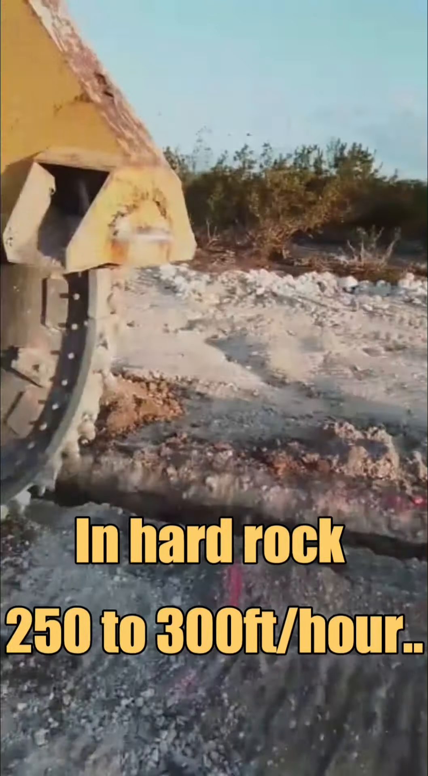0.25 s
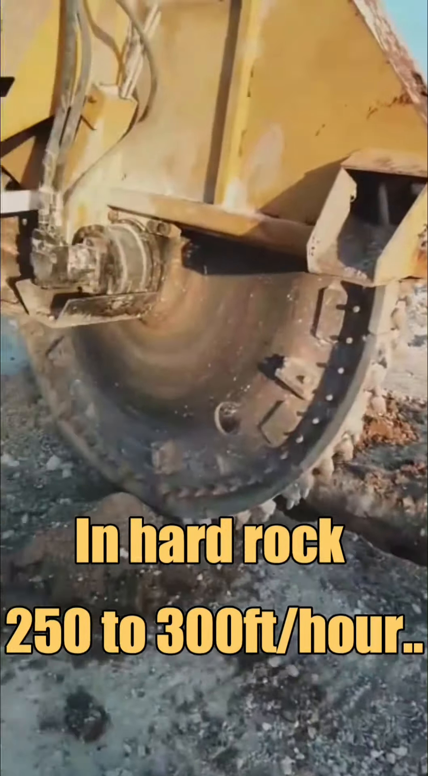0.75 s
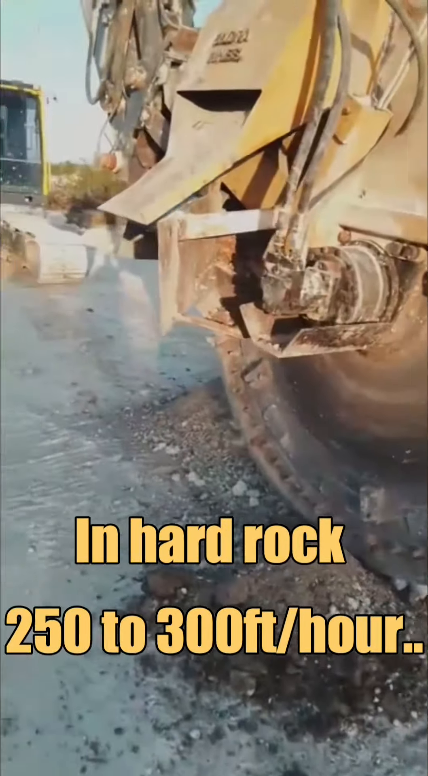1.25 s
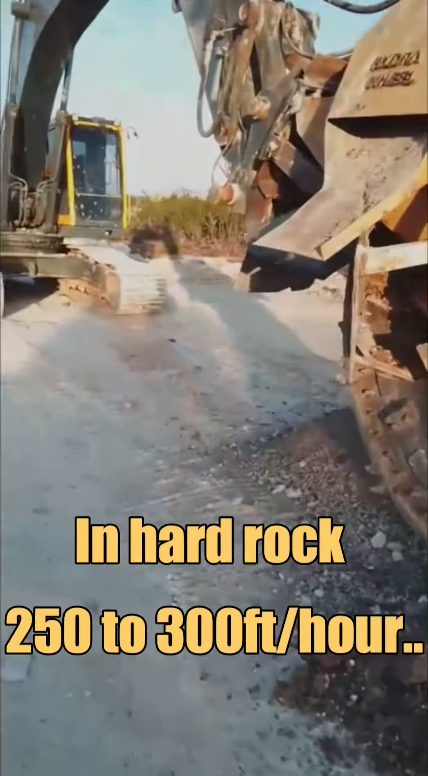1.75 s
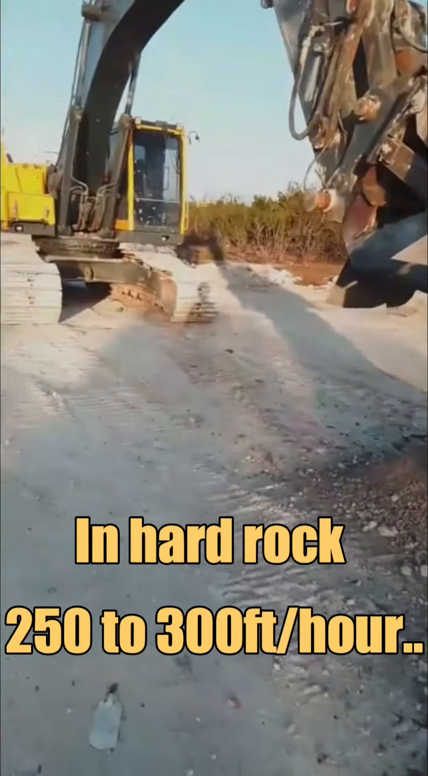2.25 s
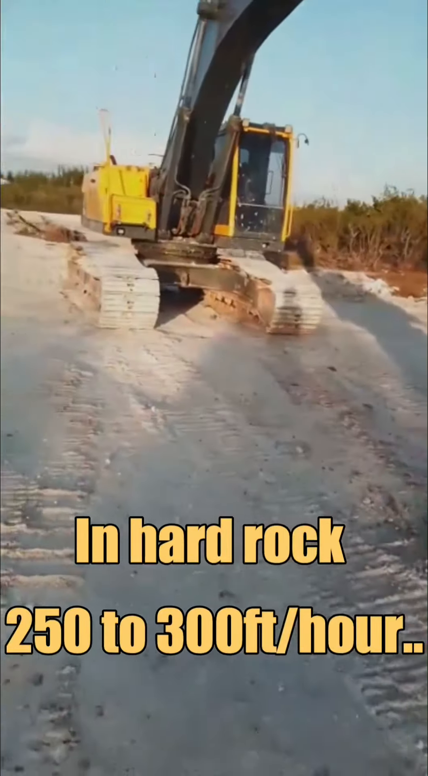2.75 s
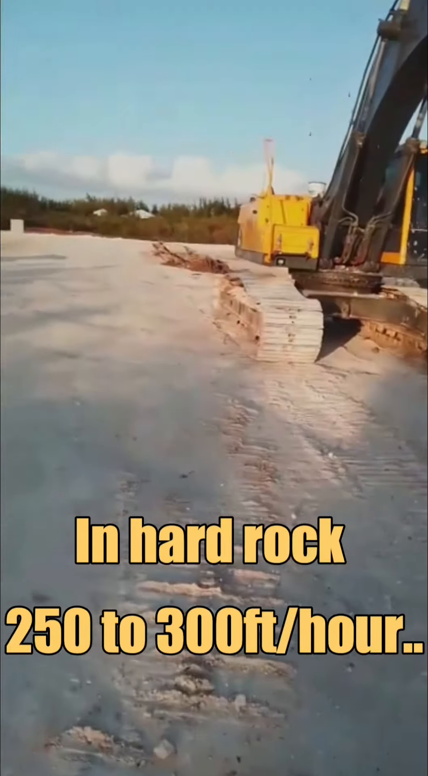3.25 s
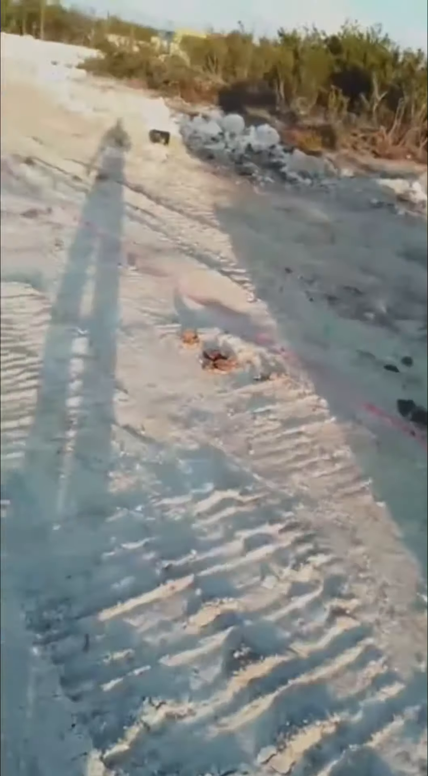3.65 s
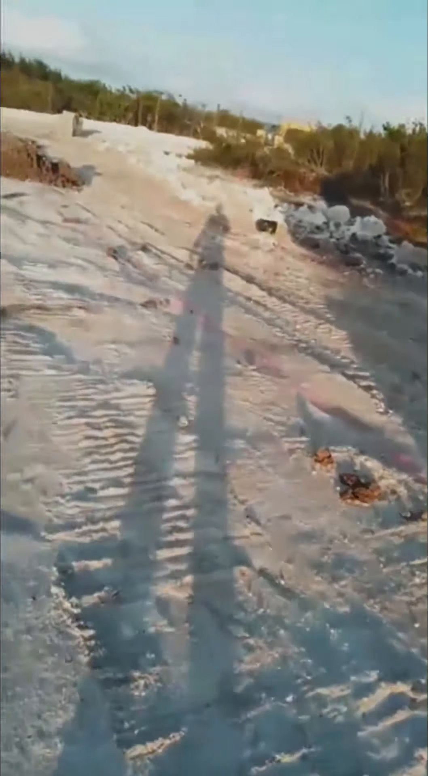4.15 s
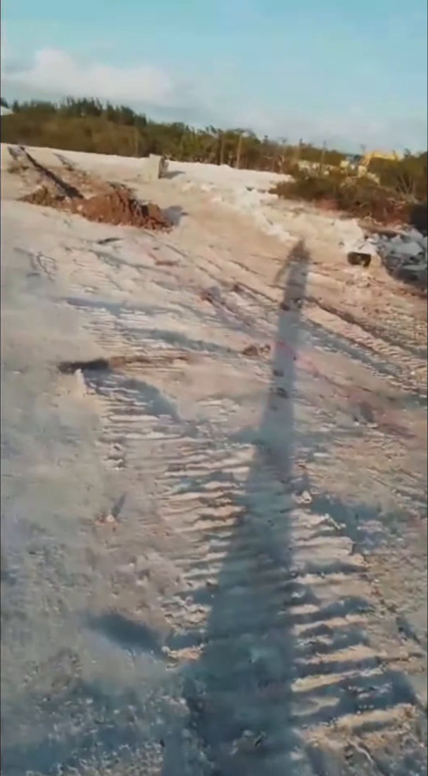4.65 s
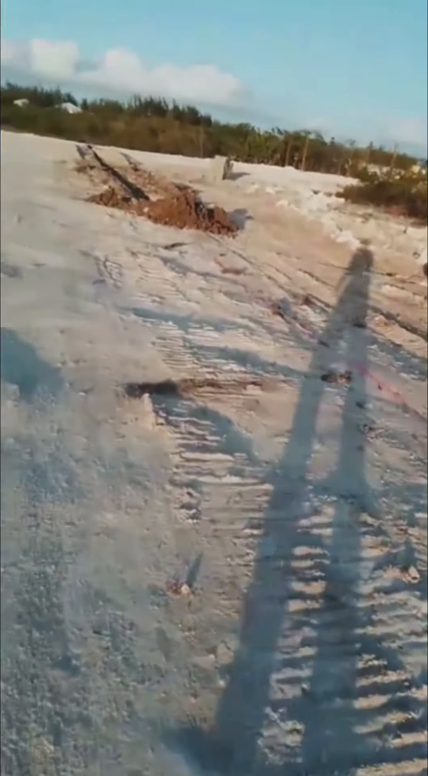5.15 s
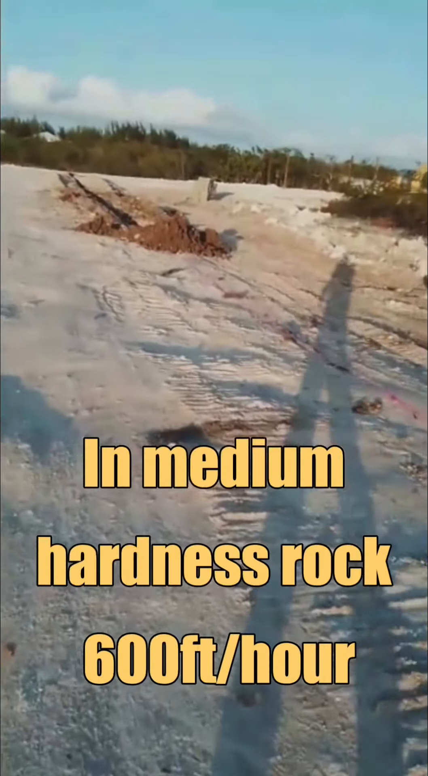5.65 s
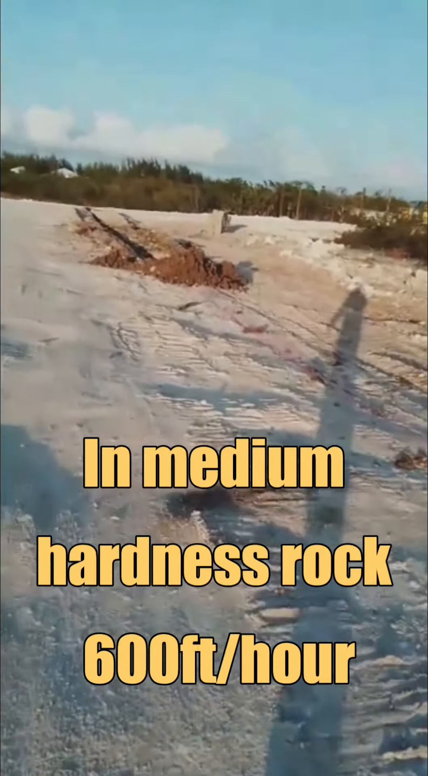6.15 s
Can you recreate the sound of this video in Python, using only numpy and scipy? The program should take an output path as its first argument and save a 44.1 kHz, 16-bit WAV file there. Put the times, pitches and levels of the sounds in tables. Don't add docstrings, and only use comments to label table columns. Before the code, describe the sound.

A diesel engine idles quietly, its bass thin and its treble smeared by the phone's noise suppression, with fast regular knocking fading slightly under low wind thumps. The worst gust overloads the microphone shortly before three seconds. Then an abrupt cut makes the idle roughly five times stronger, brighter and closer, with hard valve knocks, ticking at first and unsteady hydraulic whine; it slowly dulls a little and stops suddenly. Open outdoor site, no echo.

```python
import sys
import numpy as np
from scipy import signal
from scipy.fft import rfft, irfft, next_fast_len
from scipy.io import wavfile
from scipy.ndimage import uniform_filter1d, map_coordinates

SR = 44100
rng = np.random.default_rng(int(sys.argv[2]) if len(sys.argv) > 2 else 0)


def output_pcm(signal):
    pcm = np.clip(np.atleast_2d(signal).T, -1, 1) * 32767
    wavfile.write(sys.argv[1], SR, np.round(pcm).astype(np.int16))


def attenuation_scalar(level_db):
    decades = np.asarray(level_db, float) / 20
    return 10 ** decades


N = 282636
T = np.arange(N) / SR
CUT_S = 3.5667


# t/s, level/dB
ROAR = [
    [(0, -38.5), (1.4, -39), (2.2, -39.5), (2.8, -39), (3.55, -39)],
    [(3.57, -24.5), (3.75, -23.5), (4.3, -24), (5.2, -25), (6.41, -26)],
]
# f/Hz, density/(dB per Hz)
ROAR_SPECTRUM = [
    [(460, -34), (520, -10), (620, -0.5), (840, -7), (920, -7.5), (1050, -3.5), (1220, -4), (1480, -9.5),
     (1620, -11), (1860, -7), (1960, -15), (2000, -56)],
    [(460, -23.5), (500, -3), (610, -3), (710, -3.5), (840, -5.5), (1040, -3.5), (1260, -6.5),
     (1590, -10.5), (1840, -7.5), (1960, -9.5), (2000, -66.5)],
]
# f/Hz, density/(dB per Hz)
RUMBLE_SPECTRUM = [(30, -43), (62, -30.5), (80, -21.5), (120, -8), (170, -16.5), (200, -10), (245, 6),
                   (270, -9), (300, -59)]
# f/Hz, density/(dB per Hz)
DRONE_SPECTRUM = [(230, -52.5), (260, -6.5), (300, -1.5), (400, -6), (500, -8.5), (560, -22.5)]
DRONE_DB = [-44, -27.5]
DRONE_DB_PER_ROAR_DB = 4.4
# t of a turn/s, rate/(turns/s)
CAMSHAFT = [
    (.055, 6.52),
    (3.707, 6.53),
]
# f/Hz, level/dB
FIRING_ORDERS = [
    [(78, -28.5), (117, -25.5), (195, -15), (234, -10), (280, -5.5), (297, -7)],
    [(78, -27), (117, -26), (195, -10), (234, -10)],
]
# f/Hz, level/dB
SHAFT_ORDERS = [
    [(586.8, -15), (743, -19), (829, -15.5), (858, -18), (1034, -14), (1120, -20.5), (1491, -13)],
    [(351, -16), (429, -17), (523, -26), (547, -16), (586, -19), (855, -10), (1054, -17), (1156, -23),
     (1330, -19)],
]
LOCKED_POWER_SHARE, LOCKED_TOP_HZ = .4, 1300

# t of first knock/s, rate/(knocks/s)
VALVE = [
    (0.051, 6.51),
    (3.7031, 6.507),
]
# f/Hz, density/(dB per Hz)
KNOCK_SPECTRUM = [
    [(600, -24), (780, -6), (830, 0), (890, -19), (990, -9), (1045, 4), (1110, -17.5), (1400, -14),
     (1850, -12), (1960, -70)],
    [(300, -30.5), (560, -1), (950, -3.5), (1045, 2), (1150, -2), (1900, -7.5), (2650, -3.5), (3200, -27),
     (4300, -46.5)],
]
KNOCK_DB = [-8, -10]
NEAR_KNOCKS_DB = [-9.5, -11, -9.5, -26, -3, -14, -10.5, -8, -12, -12.5, -12, -9, -8, -7.5, -12, -6.5, -17,
                  -14]
FAR_KNOCK_DB, FAR_KNOCK_FALL_DB_PER_S, FAR_KNOCK_SCATTER_DB = -23.5, 1.8, 1

# from/s, to/s, level/dB, fall/(dB/s)
INJECTOR_HEARD = [
    (2.8, 3.1, -84, 30),
    (3.69, 4.24, -45, 18),
]
# f/Hz, density/(dB per Hz)
SPRAY_SPECTRUM = [(2900, -40), (3200, -4.5), (3700, -0.5), (4150, 0.5), (4500, -2), (5000, -3.5),
                  (5400, -40.5)]

# from/s, to/s, level/dB, fall/(dB/s)
BANDS_OPEN = [
    [[(0, .55, -44, 23), (1.0, 1.75, -50, 70), (2.62, 3.45, -50.5, 71)], [(0, .45, -73, 33),
     (1.45, 1.62, -65.5, 60), (2.58, 2.75, -61.5, 37), (2.9, 3.0, -52.5, 33)], [(0, .03, -53.5, 51),
     (1.3, 1.8, -55.5, 47), (2.13, 2.15, -54.5, 202), (2.75, 3.05, -57.5, 43), (3.28, 3.3, -58.5, 115)],
     [(1.3, 1.75, -62, 72), (2.55, 2.75, -66, 49.5), (2.87, 3.02, -56, 58)]],
    [[(3.593, 4.7, -32, 16), (5.1, 6.2, -36, 5)], [(3.597, 5.5, -41.5, 8)], [(3.597, 4.4, -49, 8),
     (4.9, 5.35, -59, 47)], [(3.65, 4.6, -55.5, 14)]],
]
# f/Hz, density/(dB per Hz)
BAND_SPECTRA = [
    [[(1930, -52), (1980, 5.5), (2200, 5.5), (2400, 4), (2560, 6.5), (2630, 4), (2730, -4.5), (2800, -17),
     (2920, -4), (3000, -38)], [(3000, -35), (3100, -3), (3300, 1), (3600, 4.5), (3900, -5), (4200, -6),
     (4320, -45)], [(4720, -42), (4790, 5.5), (4910, 11), (5000, -8), (5130, -4), (5170, -38)],
     [(5120, -34), (5200, 5), (5450, -2), (5550, -4), (5720, -1.5), (5820, -44)]],
    [[(1930, -51.5), (1980, 8), (2230, 4), (2600, 5), (2800, -1.5), (2960, -1), (3000, -60)],
     [(2930, -55.5), (2980, 7), (3620, 3), (3860, 3.5), (4150, 1), (4350, -5.5), (4420, -55)], [(4700, -45),
     (4770, 10), (4940, 5), (5120, -2.5), (5200, -10.5), (5240, -46.5)], [(5160, -36), (5210, 5.5),
     (5400, -4), (5600, -15.5), (5800, -16.5), (5900, -57.5)]],
]
BANDS_CLOSED_DB = [-68, -86, -84, -86]
# spectrum, opens at level/dB, excess level/dB
FOLLOWERS = [
    ([(6250, -61.5), (6400, 3), (7050, -5), (7250, -64.5)], -56, -4),
    ([(4300, -61.5), (4400, 8.5), (4750, 0), (4820, -54)], -62.5, 5.1),
]
# from/s, to/s, level/dB, fall/(dB/s)
BASS_OPEN = [
    [(0, 1.1, -47, 23), (1.25, 1.66, -39, 158), (2.38, 2.7, -43, 27), (2.77, 2.8, -29.5, 42.5),
     (3.1, 3.55, -47.5, 8)],
    [(3.63, 3.57, -30, 46), (3.95, 3.65, -39, 1.2)],
]
BANDS_OPEN_DB_PER_S, BASS_OPENS_DB_PER_S, BASS_CLOSED_DB = 90.5, 83.5, -78
SHUT_DB = [-85, -79]
# from/s, to/s, f/Hz, width/Hz, share lost
HOLES = [(.17, .33, 1660, 70, .7), (1.02, 1.28, 1670, 80, .8), (.28, .42, 2300, 100, .5),
         (.9, 1.32, 2300, 130, .55), (1.85, 2.3, 1490, 45, .55), (3.32, 3.55, 1520, 90, .55),
         (.52, .58, 3300, 80, .9), (1.85, 2.12, 230, 70, .8), (.2, .9, 100, 35, .5),
         (.81, .89, 110, 80, .8), (5.1, 5.75, 2270, 120, .4), (4.9, 5.3, 4600, 60, .7),
         (5.8, 6.41, 4350, 100, .55), (3.6, 4.3, 4550, 60, .45)]
# f/Hz, density/(dB per Hz)
CASING_SPECTRUM = [(2520, -38.5), (2600, 6), (2680, 3), (2760, -42)]
# from/s, to/s, level/dB, fall/(dB/s)
CASING_RINGS = [
    [(.05, 0.58, -48, 64), (1.08, 1.3, -54, 46.5)],
    [(4.5, 4.7, -39.5, 12.5)],
]

PUMP_HZ = 312.2
# from/s, to/s, level/dB, fall/(dB/s)
PUMP_WHINE = [
    [[(.35, .55, -40, 47), (.92, 1.03, -42.5, 84), (1.36, 1.45, -40.5, 37), (2.7, 2.9, -31.5, 63.5)],
     [(1.35, 2.2, -46.5, 6.5), (2.65, 2.8, -46.5, 41.5), (3.02, 3.05, -37, 92), (3.26, 3.4, -37, 38)],
     [(0, .03, -42, 13), (.95, 1.45, -43.5, 8), (3.05, 3.55, -46.5, -4)]],
    [[(3.6, 3.84, -23.5, 55), (4.22, 4.42, -25, 73), (4.64, 4.72, -32, 83), (5.5, 5.8, -29.5, 32),
     (5.98, 6.12, -27.5, 80), (6.3, 6.41, -32.5, 12)], [(3.97, 4.0, -29.5, 62), (4.35, 5.2, -28.5, 10),
     (5.5, 6.0, -33.5, 40)], [(3.57, 3.66, -28.5, 44), (6.2, 6.25, -32.5, 18)]],
]
PUMP_AWAY_DB = [
    [-63.5, -70, -64],
    [-40, -50, -47],
]
TURNS_IN_DB_PER_S = 47.5
SHAFT_DB = [-30, -14]

# from/s, to/s, level/dB, fall/(dB/s)
GUSTS = [(1.0, 1.08, -41, 602), (1.25, 1.29, -26.5, 252), (1.39, 1.41, -28, 192), (1.47, 1.54, -26, 300),
         (1.58, 1.68, -36, 140), (2.08, 2.09, -57.5, 205), (2.21, 2.42, -32, 97.5), (2.47, 2.5, -22.5, 501),
         (2.57, 2.62, -27.5, 69), (2.8, 2.85, -16.5, 197), (2.9, 3.1, -31.5, 200),
         (3.325, 3.36, -29.5, 224)]
# t/s, peak level/dB, f/Hz
EDDIES = [(1.22, -19, 282), (1.267, -11.5, 362), (1.391, -12.5, 355), (1.404, -13.5, 348),
          (1.411, -14.5, 288), (1.478, -12.5, 277), (1.509, -13.5, 324), (1.545, -16, 310),
          (2.081, -18.5, 424), (2.444, -15, 355), (2.477, -10, 330), (2.49, -9, 379), (2.572, -9, 295),
          (2.651, -13.5, 308), (2.759, -16, 252), (2.765, -4.5, 335), (2.778, -3, 424), (2.792, -1.5, 350),
          (2.812, -8.5, 445), (2.825, -9.5, 265), (2.834, -9, 634), (2.84, -6.5, 322), (2.856, -9.5, 298),
          (2.905, -9, 287), (2.914, -11.5, 377), (2.944, -12, 322), (2.965, -9, 300), (3.034, -18, 286),
          (3.34, -18.5, 413), (3.321, -20, 366), (3.362, -28, 260), (2.785, -9, 379), (2.818, -13.5, 335),
          (2.876, -21, 330), (2.893, -20, 303), (2.926, -18, 296), (2.951, -14.5, 345), (2.993, -20, 304),
          (3.044, -17.5, 300), (3.068, -25.5, 350), (3.091, -22, 382), (3.138, -25.5, 267),
          (2.479, -14.5, 620), (2.835, -10, 1070), (2.871, -26, 804), (2.766, -8.5, 735),
                (2.774, -14, 920), (2.799, -15.5, 790), (2.898, -24, 680), (2.944, -11, 600)]
# f/Hz, density/(dB per Hz)
DULL_SPECTRUM = [(40, -12.5), (150, 2), (190, -8), (340, -5), (520, -11), (700, -15), (1200, -87.5)]
# f/Hz, density/(dB per Hz)
SHARP_SPECTRUM = [(400, -37), (560, 2), (750, -17.5), (1000, -26.5), (1500, -17.5), (2500, -49)]
# f/Hz, level/dB
PORT_RESPONSE = [(30, -39.5), (60, -25), (150, -31), (200, 1.5), (900, 2), (1400, -13.5), (2200, -58)]
GUST_RISE_DB_PER_S, SHARP_DB, SHARP_DB_PER_GUST_DB = 237, -15.5, 0.64

# f/Hz, density/(dB per Hz)
HISS_SPECTRUM = [
    [(1760, -47), (3000, -5.5), (4010, -11), (5010, -4), (5560, -7), (7030, -7.5), (7640, -14),
     (11800, -22.5), (12900, -18.5), (15700, -26)],
    [(2590, -26), (4400, -5), (6220, -8.5), (6990, -14.5), (7780, -14.5), (9670, -22), (10800, -20),
     (11800, -25), (13700, -23), (15700, -30.5)],
]
# f/Hz, density/(dB per Hz)
AIR_SPECTRUM = [(6000, -26.5), (8500, -4.5), (10000, -3.5), (11300, -7.5), (12500, -30.5)]
HISS_OVER_6K_DB = [11, 13]
# from/s, to/s, level/dB, fall/(dB/s)
HISS_LEFT = [
    [[(0, 1.0, -76, 3), (1.3, 1.5, -78.5, 2.5), (2.8, 3.0, -83.5, 23.5)], [(0, .4, -69.5, 16.5)]],
    [[(3.57, 3.8, -72, 3)], [(3.7, 4.3, -77, 9.5)]],
]
HISS_LEAST_DB = -87
# f/Hz, density/(dB per Hz)
MURMUR_SPECTRUM = [(20, -19), (45, -18.5), (70, -1.5), (140, -5), (190, -26)]
# t/s, peak level/dB, spread/s
CLICKS = [
    (3.56671, -16.5, .00002),
    (5.352, -62, .009),
]


def engine(take):
    roar_db, = curves(ROAR[take])
    rumble_db = bass(take)
    drone_db = DRONE_DB[take] + DRONE_DB_PER_ROAR_DB * (roar_db - np.mean(ROAR[take], axis=0)[1])
    start_s, rate = CAMSHAFT[take]
    turns = (T - start_s + .012) * rate + .004 * wobble(3)
    firing = 1 + .9 * beat(6 * turns, 6 * rate, t60=.07, scatter_db=2)
    firing = unit(firing * attenuation_scalar(0.33 * wobble(12)))
    same, drift = cycle(), .0012 * wobble(5)

    low = attenuation_scalar(rumble_db + 2.9 * wobble(7.4)) * locked(same, RUMBLE_SPECTRUM, patchy_db=1.5)
    low += attenuation_scalar(rumble_db) * orders(FIRING_ORDERS[take], drift)
    low += attenuation_scalar(drone_db + 1.9 * wobble(15)) * locked(same, DRONE_SPECTRUM, patchy_db=1.5)

    mid = attenuation_scalar(roar_db) * firing * locked(same, ROAR_SPECTRUM[take], patchy_db=-0.23)
    mid += attenuation_scalar(roar_db) * orders(SHAFT_ORDERS[take], drift)

    tick_db = swells([INJECTOR_HEARD[take]], BANDS_OPEN_DB_PER_S, BANDS_CLOSED_DB[1] - 11.5)
    high = firing * upper_bands(take) + attenuation_scalar(tick_db) * injector(3 * turns - .1, 3 * rate)
    return low + mid + knocks(take, same) + suppressed(high, SHUT_DB[take])


def upper_bands(take):
    open_db = openings(take)
    high = np.zeros(N)
    for db, spectrum in zip(open_db, BAND_SPECTRA[take]):
        high += attenuation_scalar(db + 0.48 * wobble(17)) * rush(spectrum, patchy_db=2.0)
    spectrum, opens_db, over_db = FOLLOWERS[take]
    share = 1 / (1 + attenuation_scalar(6.4 * (opens_db - open_db[3])))
    high += share * attenuation_scalar(open_db[3] + over_db) * rush(spectrum, patchy_db=-4.0)
    casing_db = swells(CASING_RINGS[take], BANDS_OPEN_DB_PER_S, BANDS_CLOSED_DB[1])
    return high + attenuation_scalar(casing_db) * rush(CASING_SPECTRUM, patchy_db=3.5)


def knocks(take, same):
    start_s, rate = VALVE[take]
    far_db = FAR_KNOCK_DB - FAR_KNOCK_FALL_DB_PER_S * np.arange(23) / rate
    far_db = far_db + FAR_KNOCK_SCATTER_DB * rng.standard_normal(23)
    sizes_db = np.array(NEAR_KNOCKS_DB) if take else far_db
    blows = np.zeros(N)
    at = np.round((start_s + np.arange(len(sizes_db)) / rate) * SR).astype(int)
    blows[at] = attenuation_scalar(sizes_db + KNOCK_DB[take])
    decay = 0.87 * fading(T[:SR // 5], 0.0016, t60=0.16)
    return signal.fftconvolve(blows, decay)[:N] * locked(same, KNOCK_SPECTRUM[take], patchy_db=3.0)


def injector(turns, rate):
    hz = 4000 + 18000 * np.minimum(turns % 1 / rate, .02) + 60 * wobble(40)
    grit = 1 + .4 * uniform_filter1d(rng.standard_normal(N), size=36) * 6
    ring = np.sin(2 * np.pi * np.cumsum(uniform_filter1d(hz, size=60)) / SR)
    body = 1.1 * grit * ring + .8 * rush(SPRAY_SPECTRUM, patchy_db=2)
    return unit(beat(turns, rate, t60=.045, scatter_db=1.2) * body)


def cycle():
    turns = T * PUMP_HZ / 48 + .0012 * wobble(4)
    grid, tables = np.arange(6781) / 6780, rng.standard_normal((3, 6781))
    return sum(g * np.interp(k * turns % 1, grid, v) for k, g, v in zip((1, 3, 6), (1, .8, .6), tables))


def locked(same, spectrum, patchy_db):
    steady = filtered(same, lambda hz: gains(spectrum, hz) / np.sqrt(1 + (hz / LOCKED_TOP_HZ) ** 4))
    loose = rush(spectrum, patchy_db)
    return np.sqrt(LOCKED_POWER_SHARE) * unit(steady) + np.sqrt(1 - LOCKED_POWER_SHARE) * loose


def orders(rows, drift):
    return sum(attenuation_scalar(db) * (1 + 0.33 * wobble(5)) * np.sin(hz * (2 * np.pi * T + drift)) for hz, db in rows)


def pumps(take):
    turn = 2 * np.pi * PUMP_HZ * T + 0.3 * wobble(6)
    whine = np.zeros(N)
    for k, rows, away_db in zip((1, 2, 4), PUMP_WHINE[take], PUMP_AWAY_DB[take]):
        level_db = swells(rows, TURNS_IN_DB_PER_S, away_db) + 2.3 * wobble(30)
        whine += attenuation_scalar(level_db) * np.sin(k * turn + 0.28 * k * wobble(18))
    roar_db, = curves(ROAR[take])
    gear_db = roar_db - 14.5 + 2.2 * wobble(9.9)
    gear = attenuation_scalar(gear_db) * np.sin(2 * np.pi * 1846 * T + 3.3 * wobble(14))
    shaft_db = swells(BANDS_OPEN[take][1], BANDS_OPEN_DB_PER_S, BANDS_CLOSED_DB[1]) + SHAFT_DB[take]
    shaft = attenuation_scalar(shaft_db + 2.0 * wobble(4.9)) * np.sin(2 * np.pi * 3853 * T + 0.88 * wobble(23))
    hum_db = np.minimum(bass(take) - 7, -57)
    hum = attenuation_scalar(hum_db + 1.5 * wobble(5)) * np.sin(2 * np.pi * 150.7 * T + .4 * wobble(5))
    return whine + gear + shaft + hum


def wind():
    lumps = unit(attenuation_scalar(1.7 * wobble(70)))
    dull = lumps * rush(DULL_SPECTRUM, patchy_db=-0.5)
    sharp = lumps * rush(SHARP_SPECTRUM, patchy_db=-1.0)
    gust_db = swells(GUSTS, GUST_RISE_DB_PER_S, -120)
    x = attenuation_scalar(gust_db - 3.0) * (dull + attenuation_scalar(SHARP_DB + SHARP_DB_PER_GUST_DB * (gust_db + 24)) * sharp)
    t = np.arange(-400, 800) / SR
    for s, db, hz in EDDIES:
        phase = rng.uniform(0, 2 * np.pi)
        eddy = np.exp(-((t - .004) * hz / 1.05) ** 2) * np.sin(2 * np.pi * hz * t + phase)
        x[round(s * SR) - 400:][:len(t)] += attenuation_scalar(db - 3.5) * eddy
    x = x / (1 + abs(x / 0.4) ** 4) ** (1 / 4)
    return filtered(x, lambda hz: gains(PORT_RESPONSE, hz))


def clicks():
    x = np.zeros(N)
    for s, db, spread_s in CLICKS:
        grain = -1 if spread_s < .001 else rng.standard_normal(N)
        x += attenuation_scalar(db) * grain * np.exp(-((T - s) / spread_s) ** 2)
    return x


def hiss(take):
    hiss_db, air_db = (swells(rows, TURNS_IN_DB_PER_S, HISS_LEAST_DB) for rows in HISS_LEFT[take])
    air = attenuation_scalar(air_db - 2.0) * rush(AIR_SPECTRUM, patchy_db=1.6)
    grain = attenuation_scalar(hiss_db + HISS_OVER_6K_DB[take]) * rush(HISS_SPECTRUM[take], patchy_db=1.8)
    return air + grain + attenuation_scalar(-78) * rush(MURMUR_SPECTRUM, patchy_db=1.0)


def bass(take):
    return swells(BASS_OPEN[take], BASS_OPENS_DB_PER_S, BASS_CLOSED_DB)


def openings(take):
    return [swells(rows, BANDS_OPEN_DB_PER_S, db) for rows, db in zip(BANDS_OPEN[take], BANDS_CLOSED_DB)]


def suppressed(x, shut_db):
    z = signal.stft(x, nperseg=512)[2]
    power = uniform_filter1d(uniform_filter1d(abs(z) ** 2, 2, 0), 20, 1)
    level_db = 10 * np.log10(abs(power) + 1e-20)
    loss = 1 + attenuation_scalar(np.clip(4 * (shut_db - level_db), -80, 40))
    return signal.istft(z / loss, nperseg=512)[1][:N]


def holed(x):
    hz, t, z = signal.stft(x, SR, nperseg=1024)
    for a, b, centre_hz, width_hz, lost in HOLES:
        band = np.exp(-((hz - centre_hz) / width_hz) ** 4)
        while_shut = np.clip(np.minimum(t - a, b - t) / .04 + .5, 0, 1)
        z = z * (1 - lost * np.outer(band, while_shut))
    return signal.istft(z, SR, nperseg=1024)[1][:N]


def unit(x):
    return x / np.sqrt(np.mean(x ** 2) + 1e-20)


def curves(rows):
    s, *cols = np.transpose(rows)
    return [np.interp(T, s, c) for c in cols]


def swells(rows, rise, rest_db):
    t = T[::128]
    power = attenuation_scalar(2 * rest_db)
    for a, b, db, fall in rows:
        slopes_db = rise * np.clip(a - t, 0, 9) + abs(fall) * np.clip(t - b, 0, 9)
        power = power + attenuation_scalar(2 * (db - slopes_db))
    return np.interp(T, t, 10 * np.log10(power))


def wobble(rate):
    return np.interp(T, T[::64], map_coordinates(rng.standard_normal(500), [T[::64] * min(rate, 75)]))


def fading(age, attack, t60):
    return (1 - np.exp(-(age / attack) ** 2)) * attenuation_scalar(-60 * age / t60)


def beat(turns, rate, t60, scatter_db):
    size = attenuation_scalar(scatter_db * rng.standard_normal(400))[np.floor(turns).astype(int) % 400]
    return uniform_filter1d(size * fading(turns % 1 / rate, 0.0056, t60), size=60)


def gains(spectrum, hz):
    f, db = np.transpose(spectrum)
    return attenuation_scalar(np.interp(np.log(hz + 1), np.log(f + 1), db, -120, -120))


def filtered(x, response):
    m = next_fast_len(N + 8192)
    return irfft(rfft(x, m) * response(np.fft.rfftfreq(m, 1 / SR)), m)[:N]


def rush(spectrum, patchy_db):
    re, im, field = rng.standard_normal((3, 1025, N // 1024 + 3))
    field = uniform_filter1d(uniform_filter1d(field, 6, 0), 4, 1)
    gain = gains(spectrum, np.fft.rfftfreq(2048, 1 / SR))[:, None] * attenuation_scalar(patchy_db * unit(field))
    return unit(signal.istft((re + 1j * im) * gain, nperseg=2048, window="cosine")[1][:N])


def scene():
    motor = holed(np.where(T < CUT_S, engine(0), engine(1)))
    far = pumps(0) + hiss(0) + wind()
    near = pumps(1) + hiss(1)
    fade_out = np.clip((T[-1] - T) / 0.0011, 0, 1)
    return ((motor + np.where(T < CUT_S, far, near)) * fade_out + clicks())[None]


def low_pass(x):
    return signal.sosfilt(signal.butter(12, 16670, fs=SR, output="sos"), x)


def record(dry):
    def colour(hz):
        notch = 1 - .75 * np.exp(-((hz - 168) / 8) ** 2)
        top = np.clip((16700 - hz) / 500, 0, 1)
        return notch * top * hz / np.sqrt(hz ** 2 + 60 ** 2)

    mix = filtered(dry[0], colour)[None]
    return low_pass(mix)


dry = scene()
out = record(dry)
output_pcm(out)
```